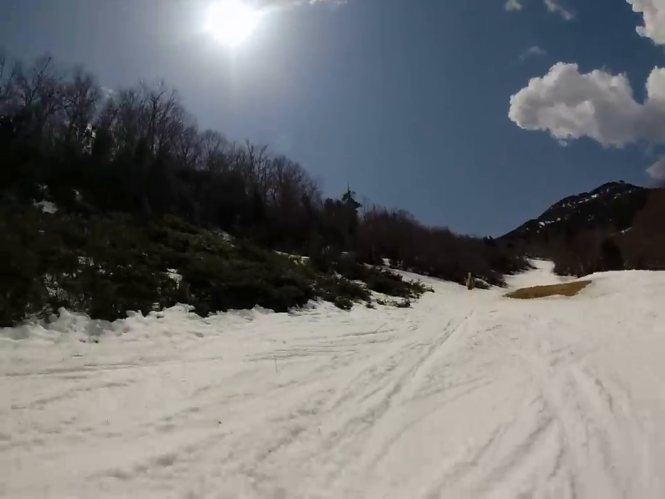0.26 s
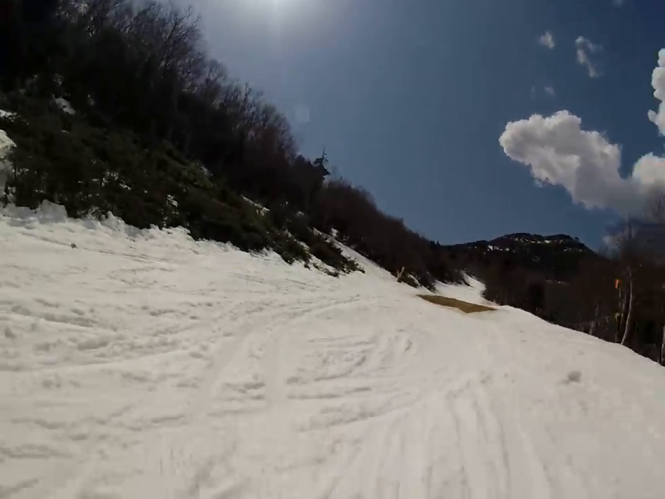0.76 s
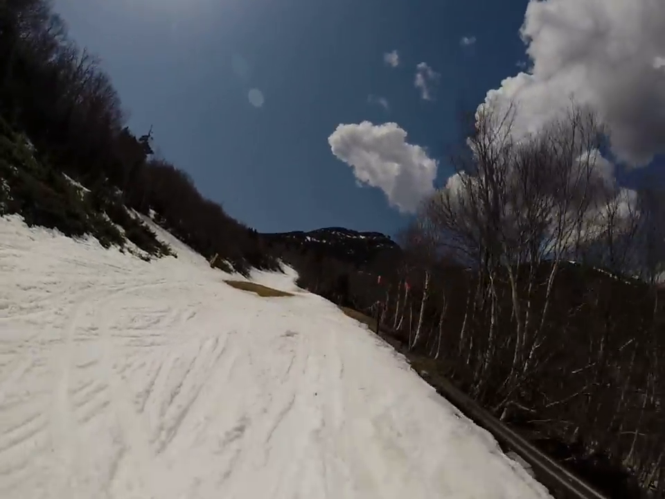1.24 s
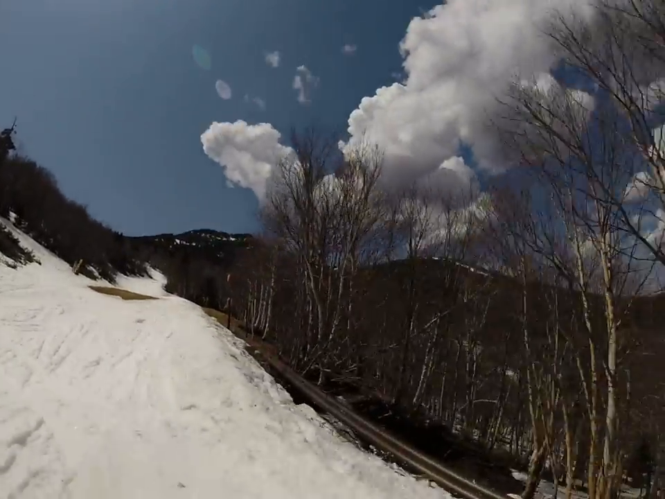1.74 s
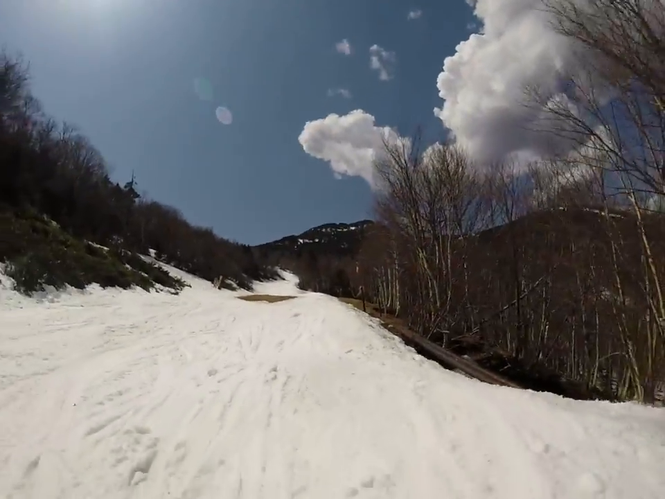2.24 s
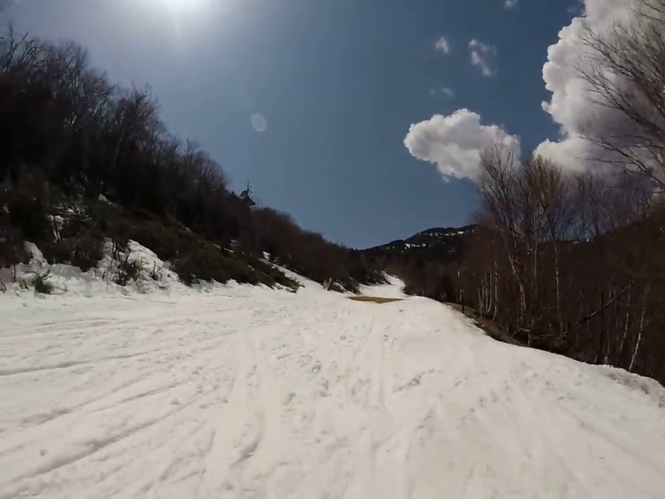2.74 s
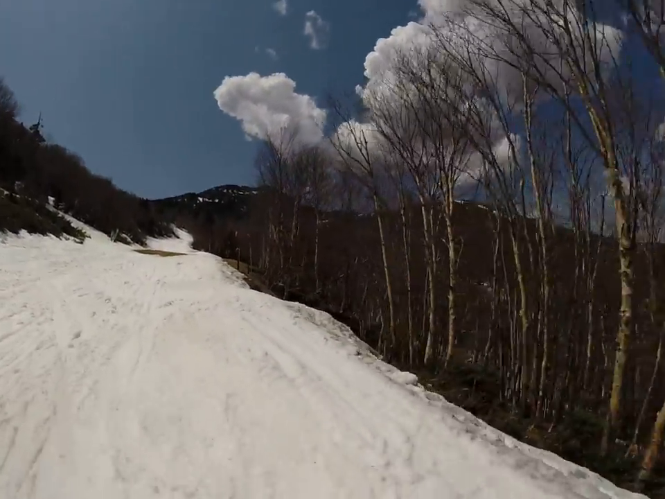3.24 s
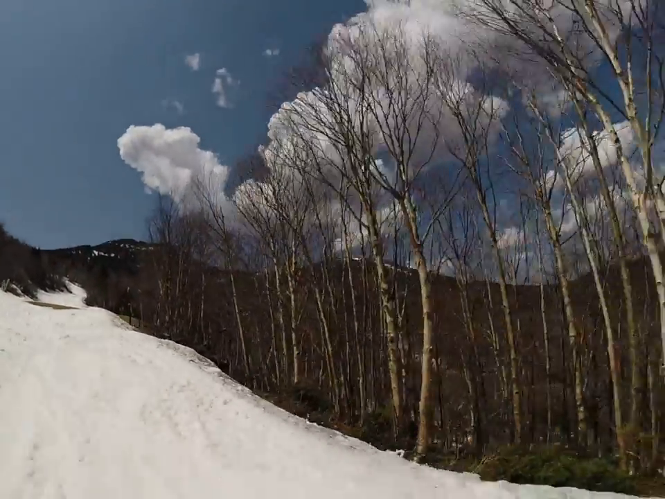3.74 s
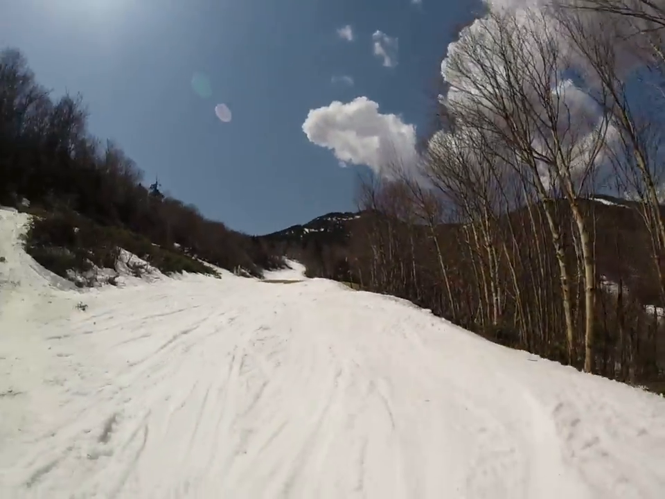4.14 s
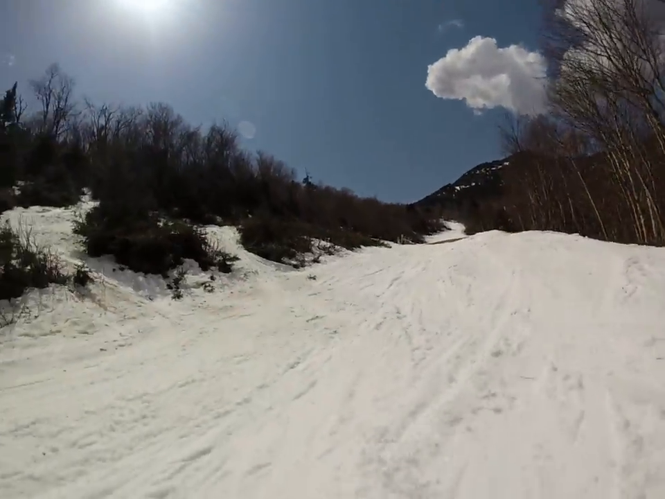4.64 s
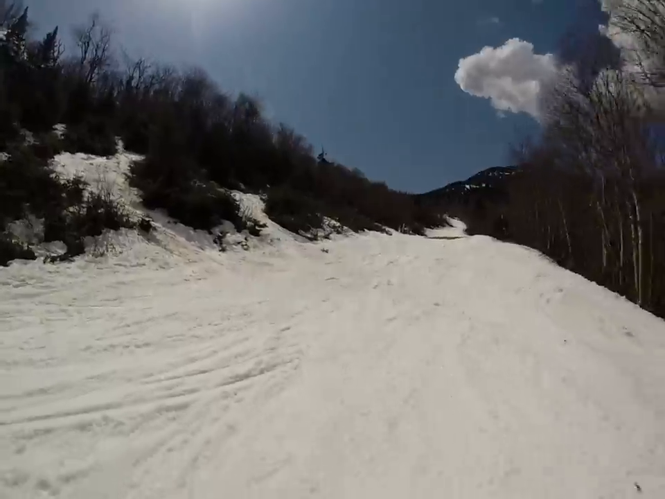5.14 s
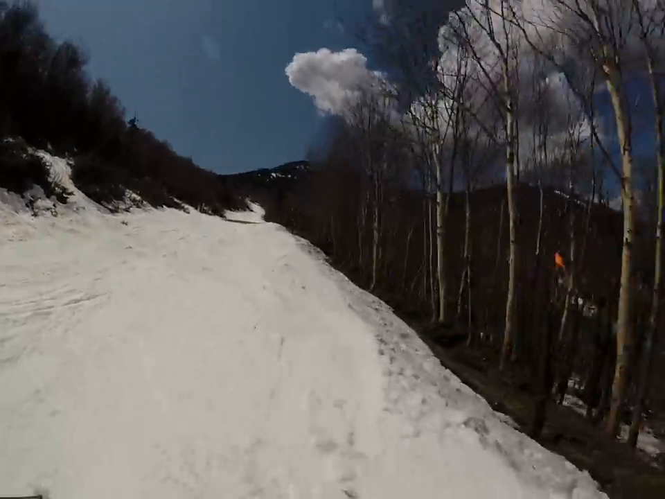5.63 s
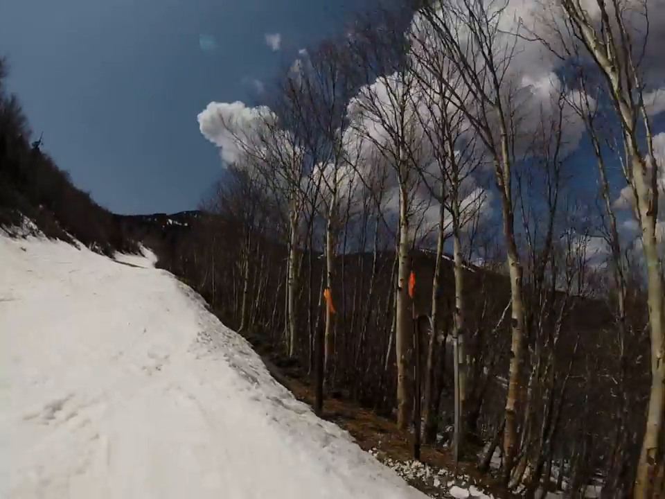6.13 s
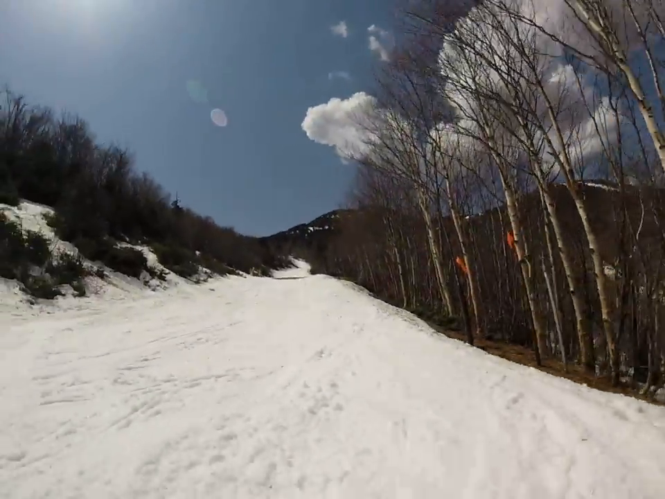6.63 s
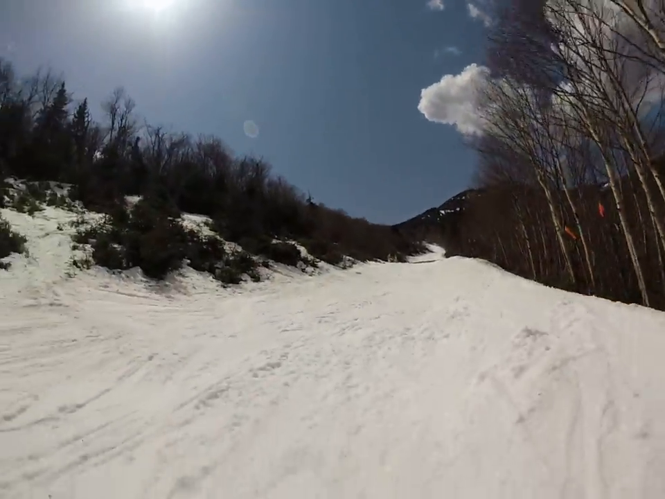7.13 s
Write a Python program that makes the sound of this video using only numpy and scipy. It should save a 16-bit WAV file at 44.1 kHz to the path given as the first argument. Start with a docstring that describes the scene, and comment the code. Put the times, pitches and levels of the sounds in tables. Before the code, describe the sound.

A plastic knock opens the sound, followed by a sharp clack at about 0.4 seconds. Skis hiss over wet, grainy snow throughout, heard close from a cased camera on the skier, with gusts of wind rumbling underneath. The edges scrape at the start, then throw a spray of slush from about 1.5 to 2 seconds, with a dull bump and a gust. Lighter turns follow near 2.5 and 3.5 seconds. Around 3.4 seconds the case clacks and knocks on its mount in a quick cluster. A stronger scrape runs from 4.6 to 5.1 seconds, ending with a sharp tick of ice. Another turn scrapes and sprays near 6 seconds, with a gust and small ticks, and one more near 6.9. A sharp clack comes at 7.2 seconds. All along, bumps thud softly and rough patches make the skis shudder and the case buzz.

```python
"""A plastic knock, then the hiss of skis on slushy spring snow, heard from a cased camera on the skier.
The bases glide on wet grains all the way; in each turn the edges scrape and throw a spray of slush.
Bumps thud up through the body, rough snow shakes the skis, and the case buzzes and clacks on its mount.
A few ice crumbs tick against it, and gusts of wind rumble underneath."""
import sys
import numpy as np
from scipy import signal
from scipy.fft import rfft, irfft, next_fast_len
from scipy.io import wavfile
from scipy.ndimage import uniform_filter1d, map_coordinates

SR = 44100
rng = np.random.default_rng(int(sys.argv[2]) if len(sys.argv) > 2 else 0)


def unload_wav(signal):
    """Save mono or channel-first audio to the path in sys.argv[1] as 16-bit WAV at rate SR, clipped to [-1, 1]."""
    wavfile.write(
        sys.argv[1],
        SR,
        np.round(np.clip(np.atleast_2d(signal).T, -1, 1) * 32767).astype(np.int16),
    )


N = 325458

# Tone of the wind on the case: f/Hz, level/dB
WIND_EQ = [(10, -9), (24, 5), (42, 0), (62, -11), (110, -20), (220, -42), (800, -81)]
# Gust strength, used relative to its mean: t/s, level/dB
GUSTS = [(0.0, -49), (0.33, -47.5), (0.68, -39), (1.52, -39.5), (1.58, -27.5), (1.72, -39.5), (1.77, -26),
         (1.89, -38), (2.32, -41), (2.49, -34.5), (2.84, -42.5), (3.1, -33.5), (3.19, -41), (3.33, -35),
         (3.41, -40), (3.53, -31), (3.74, -44), (4.01, -37), (4.62, -40.5), (4.73, -31), (4.83, -37),
         (5.65, -44), (6.17, -23), (6.23, -36), (6.68, -41), (7.38, -39)]
# Tone of the skis shaking over ruts: f/Hz, level/dB
JUDDER_EQ = [(30, -31), (75, 1), (140, -2), (220, -8.5), (350, -11), (550, -15), (1200, -26), (4000, -66)]
# Rough patches that rattle case and skis: middle t/s, length/s, buzz level/dB, judder level/dB
ROUGH_PATCHES = [(0.277, 0.16, -38, -50), (0.877, 0.16, -54, -52), (1.055, 0.062, -41, -49),
                 (1.225, 0.17, -41.5, -51.5), (1.55, 0.051, -41.5, -40), (1.812, 0.45, -45, -63),
                 (2.258, .04, -50, -57), (3.07, 0.096, -47.5, -49.5), (3.31, 0.038, -40, -51),
                 (3.553, 0.053, -35.5, -40), (3.972, 0.038, -47.5, -60), (4.188, 0.12, -46, -52),
                 (4.47, 0.081, -44, -49), (4.688, 0.05, -35.5, -69), (5.435, 0.11, -47.5, -53),
                 (5.723, 0.13, -49, -46), (6.08, 0.11, -39.5, -51), (6.398, .13, -41.5, -51.5)]
# The skis hit bumps: t/s, level/dB
BUMPS = [(0.121, -29.5), (0.891, -36), (0.918, -33.5), (1, -35), (1.762, -23), (1.997, -32), (2.13, -33),
         (2.463, -28.5), (2.701, -36.5), (3.023, -37), (3.462, -29.5), (3.564, -28.5), (4.099, -33),
         (4.753, -27), (5.714, -31.5), (6.108, -28), (6.439, -29.5), (6.96, -31.5), (7.11, -26.5)]
# Tone of a bump felt through the body: f/Hz, level/dB
THUD_EQ = [(30, -10.5), (110, 9), (200, -6), (380, -10.5), (520, -22.5), (900, -19), (2000, -56),
           (6000, -78)]
# Ice crumbs hit the case: t/s, level/dB
CRUMBS = [(0.1192, -24), (3.6331, -46), (5.0119, -12), (6.1395, -17), (6.552, -25.5), (7.2913, -28)]
# Tone of a crumb's tick: f/Hz, level/dB
TICK_EQ = [(200, -56), (900, 10), (1550, 8.5), (1900, 7), (3000, 4), (3800, 3), (4700, 8), (6200, -7),
           (8500, -41), (15000, -47)]
# The case hits its mount: t/s, clack level/dB, knock level/dB, thump level/dB
CLACKS = [(0.0004, -23.5, -19, -10), (0.3647, -2, -18.5, -20.5), (0.9206, -28.5, -38, -39),
          (1.1726, -30, -41, -28), (1.2146, -42, -49, -40), (1.5078, -26.5, -50, -28),
          (2.3181, -36, -46, -50), (3.3202, -44, -28, -15.5), (3.3859, -9, -14, -11.5),
          (3.4179, -30, -22.5, -19.5), (3.4625, -22, -37.5, -17), (3.5163, -28, -19.5, -14.5),
          (3.5367, -31, -21, -13), (5.014, -19, -25.5, -22), (5.6146, -29, -56, -38),
          (6.5817, -31, -24.5, -43), (7.1781, -2, -14, -10.5)]
# Ring of the case after a clack: f/Hz, level/dB, t60/s
SHELL_MODES = [(1614, -32, 0.031), (1830, -22.5, 0.053), (2810, -26, 0.046), (3460, -45, 0.027),
               (4500, -21.5, 0.005)]
# Ring of the mount: f/Hz, level/dB, t60/s
MOUNT_MODES = [(572.5, -17, 0.091), (702, -16.5, 0.03), (940, -34, .018)]
# Tone of the knock in the mount: f/Hz, level/dB
KNOCK_EQ = [(20, -22), (70, -8), (150, 7), (330, 5), (470, -14), (590, 4), (900, -1.5), (1120, -10),
            (1550, 4), (1900, -21.5), (3000, -33), (4000, -16), (12000, -29)]
# Peaks and dips of the shaken case: f/Hz, width/Hz, level/dB
CASE_COLOUR = [(340, 270, 5.5), (1537, 170, 5), (1805, 134, -12), (2160, 250, 10), (3290, 360, 3),
               (4840, 160, 6), (5340, 260, 1), (5600, 290, 0.5), (7220, 500, 4), (8600, 1400, -4.5),
               (9020, 490, 3.5)]
# Peaks and dips of its front wall for airborne sound: f/Hz, width/Hz, level/dB
WALL_COLOUR = [(2380, 500, 7.5), (2960, 240, 6.5), (3570, 130, -14), (4470, 200, 5), (5140, 140, -16),
               (5470, 440, 6.5), (6400, 310, 2.5)]
# Base fader for the hiss, scrape and spray of skis running flat: t/s, level/dB
SLIDE_FADER = [(0.04, -62.5), (0.1, -62), (0.32, -65), (0.86, -64.5), (0.88, -61), (1.08, -70),
               (1.26, -63.5), (1.33, -67.5), (1.84, -62), (2.06, -72), (2.33, -69.5), (2.45, -66),
               (2.68, -65.5), (2.9, -69.5), (3.41, -61.5), (4.07, -67.5), (4.15, -68), (4.44, -61),
               (4.82, -60), (5.09, -63), (5.17, -67.5), (6.03, -61), (6.17, -72), (6.21, -58),
               (6.25, -65.5), (6.52, -64), (6.77, -65.5), (6.81, -63), (6.97, -63.5), (6.99, -57),
               (7.17, -66.5), (7.38, -60)]
# Tone of the bases on wet snow: f/Hz, level/dB
GLIDE_EQ = [(300, -2), (1000, -27), (3000, 5), (7300, 4.5), (8500, 2.5), (11000, -4), (15000, -11)]
# Tone of the thrown slush: f/Hz, level/dB
SPRAY_EQ = [(250, -6.5), (600, -1), (1300, -1.5), (2000, 5.5), (2900, -0.5), (3800, -2), (6300, -4.5),
            (7500, -21.5), (10000, -39), (15000, -36)]
# Tone of the scraping edges: f/Hz, level/dB
SCRAPE_EQ = [(150, -26), (400, -12), (750, -5), (1250, 0.5), (1700, 3), (2600, -11), (3500, -8.5),
             (6000, -27), (12000, -49)]
# Turns and brief checks: full bite t/s, hold/s, rise/s, release/s, scrape level/dB, spray level/dB
TURNS = [(0.003, 0.29, .2, 0.43, -47.5, -62), (1.53, 0.052, 0.065, 0.17, -47, -51),
         (1.718, 0.15, 0.45, 0.24, -48, -39.5), (2.111, 0.02, 0.032, 0.034, -50, -46.5),
         (2.45, 0.15, 0.27, 0.52, -48.5, -59), (3.52, .3, 0.25, 0.35, -68.5, -44.5),
         (4.621, .44, 0.099, 0.22, -39, -54.5), (6.05, 0.14, 0.31, 0.44, -42, -37.5),
         (6.852, 0.1, 0.18, 0.58, -39.5, -48)]


def amp(db):
    """Decibels to gain."""
    return 10 ** (np.asarray(db) / 20)


def unit(x):
    """Scale to rms 1."""
    return x / np.sqrt(np.mean(x ** 2) + 1e-20)


def eq_gain(eq, hz):
    """Gain of an EQ curve, read on a log frequency axis."""
    f, db = np.transpose(eq)
    return amp(np.interp(np.log(hz + 1), np.log(f), db))


def fader(points):
    """Join timed levels with straight ramps, one value a sample."""
    return np.interp(np.arange(N) / SR, *np.transpose(points))


def wobble(rate):
    """A smooth random curve, rate knots a second."""
    knots = rng.standard_normal(4096)
    coarse = np.arange(0, N, 32)
    return np.interp(np.arange(N), coarse, map_coordinates(knots, [coarse * rate / SR], mode="wrap"))


def swells(rows):
    """Joint gain of bell-shaped swells: middle t/s, length/s, level/dB."""
    coarse = np.arange(0, N, 32)
    power = sum(amp(db) ** 2 * np.exp(-(2 * (coarse / SR - s) / length) ** 2) for s, length, db in rows)
    return np.interp(np.arange(N), coarse, np.sqrt(power))


def filtered(x, response):
    """Shape x with a frequency response."""
    size = next_fast_len(len(x) + SR // 4)
    return irfft(rfft(x, size) * response(np.fft.rfftfreq(size, 1 / SR)), size)[:len(x)]


def through_case(x, eq, colour):
    """Give x its tone and the peaks and dips of the plastic, at rms 1."""
    def colour_db(hz):
        return sum(db / (1 + (2 * (hz - centre) / width) ** 2) for centre, width, db in colour)
    return unit(filtered(x, lambda hz: eq_gain(eq, hz) * amp(colour_db(hz))))


def pulse(eq, size=4096):
    """A minimum-phase hit with this tone, at peak 1."""
    cepstrum = irfft(np.log(eq_gain(eq, np.fft.rfftfreq(size, 1 / SR))))
    cepstrum[1:size // 2] *= 2
    cepstrum[size // 2 + 1:] = 0
    hit = irfft(np.exp(rfft(cepstrum)))
    return hit / np.abs(hit).max()


def ring(modes, t, scatter_db=1.5):
    """Damped modes, struck at new strengths each time."""
    return sum(amp(db + scatter_db * rng.standard_normal() - 60 * t / t60) * np.sin(2 * np.pi * hz * t)
               for hz, db, t60 in modes)


def bloom(t, hz, peak_s):
    """A tone that swells until peak_s, then dies away."""
    return t / peak_s * np.exp(1 - t / peak_s) * np.sin(2 * np.pi * hz * t)


def add(track, s, sound):
    """Mix a sound into the track at time s."""
    start = round(s * SR)
    track[start:start + len(sound)] += sound[:N - start]


def grains(rate, share):
    """Random tiny impacts, rate a second, carrying a share of the power over a smooth rush."""
    impacts = (rng.random(N) < rate / SR) * rng.standard_normal(N)
    return np.sqrt(share) * unit(impacts) + np.sqrt(1 - share) * rng.standard_normal(N)


def strikes(hits, eq, crunch_db, crunch_t60):
    """Each blow is one push and a short crunch of crushed snow."""
    track, t = np.zeros(N), np.arange(SR // 16) / SR
    push = pulse(eq)
    for s, db in hits:
        crunch = rng.standard_normal(len(t)) * amp(-60 * t / crunch_t60)
        force = (t == 0) + amp(crunch_db) * crunch / np.linalg.norm(crunch)
        blow = signal.fftconvolve(force, push)
        add(track, s, amp(db) * blow * np.linalg.norm(push) / np.linalg.norm(blow))
    return track


def wind(mean_db=-42, gust_depth=1.15):
    """Eddies buffet the case: an even low bed that swells with each gust."""
    eddies = filtered(rng.standard_normal(N), lambda hz: eq_gain(WIND_EQ, hz))
    bed = eddies / np.sqrt(np.abs(uniform_filter1d(eddies ** 2, size=SR // 8)) + 1e-12)
    gust_db = fader(GUSTS)
    return bed * amp(mean_db + gust_depth * (gust_db - gust_db.mean()) + 2.0 * wobble(9.8))


def ski_judder(edge_spray, flat_db=-53.5, plough_knee_db=-52):
    """The skis shudder over small ruts, harder on rough patches and where they plough."""
    plough = np.hypot(1, edge_spray / amp(plough_knee_db)) ** 0.11
    rough = swells([(s, length, db) for s, length, _, db in ROUGH_PATCHES])
    ruts = grains(rate=260, share=0.41) * amp(3.2 * wobble(18))
    judder = unit(filtered(ruts, lambda hz: eq_gain(JUDDER_EQ, hz)))
    return np.hypot(amp(flat_db) * plough, rough) * judder


def bump_thuds(sway_db=-14.5):
    """Each bump thuds up through the body and rocks the camera for a few slow cycles."""
    track = strikes(BUMPS, THUD_EQ, crunch_db=2.5, crunch_t60=0.071)
    sway = bloom(np.arange(SR // 4) / SR, hz=36.8, peak_s=0.031)
    for s, db in BUMPS:
        add(track, s, amp(db + sway_db) * sway)
    return track


def ice_ticks():
    """Crumbs of ice strike the case with a tiny crunch."""
    return strikes(CRUMBS, TICK_EQ, crunch_db=6, crunch_t60=0.0071)


def case_buzz(edge_scrape, idle_db=-56, edge_send_db=-8.5, centre_hz=2270, width_hz=450):
    """Vibration keeps the case chattering in flurries of tiny taps on its main resonance."""
    def resonance(hz):
        return 1j * hz * width_hz / (centre_hz ** 2 - hz ** 2 + 1j * hz * width_hz)
    running = np.hypot(amp(idle_db + 2.1 * wobble(16)), amp(edge_send_db) * edge_scrape)
    rough = swells([(s, length, db) for s, length, db, _ in ROUGH_PATCHES])
    flurries = grains(rate=990, share=0.37) * amp(2.1 * wobble(80))
    hard_taps = amp(-9.5) * grains(rate=28, share=1)
    chatter = unit(filtered(flurries + hard_taps, lambda hz: resonance(hz) ** 2))
    return np.hypot(running, rough) * chatter


def case_clacks(thump_hz=128, thump_t60=0.016):
    """The case snaps against its mount: a short clack, a knock in the mount and a low thump."""
    track, t = np.zeros(N), np.arange(4096) / SR
    clack = bloom(t, hz=2310, peak_s=0.00079)  # coupled walls hand the blow over in a few cycles
    knock = pulse(KNOCK_EQ, size=len(t))
    thump = amp(-60 * t / thump_t60) * np.sin(2 * np.pi * thump_hz * t)
    for s, clack_db, knock_db, thump_db in CLACKS:
        add(track, s, amp(clack_db) * (clack + ring(SHELL_MODES, t)))
        add(track, s, -amp(knock_db) * (knock + ring(MOUNT_MODES, t)))
        add(track, s + 0.00286, amp(thump_db) * thump)  # the mount gives way just after the blow
    return track


def soften(x, corner_hz):
    """Plastic and wet snow give a little on contact, which takes off the top."""
    return signal.sosfilt(signal.butter(3, corner_hz, fs=SR, output="sos"), x)


def edge_bite(ramp_db=19):
    """Scrape and spray envelopes: the edges bite, hold and let go, by ramp_db per rise or release."""
    t, scrape_power, spray_power = np.arange(N) / SR, 0, 0
    for s, hold, rise, release, scrape_db, spray_db in TURNS:
        before, after = np.maximum(s - t, 0), np.maximum(t - s - hold, 0)
        bite = amp(-ramp_db * (before / rise + after / release))
        scrape_power += (amp(scrape_db) * bite) ** 2
        spray_power += (amp(spray_db) * bite) ** 2
    return np.sqrt(scrape_power), np.sqrt(spray_power)


def skis_on_slush(edge_scrape, edge_spray, splash_s=0.07, splash_send_db=-25.5):
    """Bases hiss on the wet surface, edges shear off clumps, and the thrown slush patters down."""
    heaps = amp(0.65 * wobble(22))  # heaps of slush swell all three layers
    clumps = wobble(45)  # uneven snow under the edge drives both scrape and spray
    shearing = grains(rate=3000, share=0.57) * amp(clumps + 1.9 * wobble(170))
    patter = grains(rate=5000, share=0.43) * amp(2.26 * clumps)
    wet_patches = amp(0.17 * wobble(22) + 1.05 * wobble(60))
    sliding = grains(rate=5500, share=0.22) * wet_patches
    slide_db = fader(SLIDE_FADER)  # keeps all three layers going between turns
    splash = swells([(s, splash_s, db + splash_send_db) for s, db in BUMPS])  # bumps throw up slush
    thrown = np.hypot(edge_spray, splash)
    glide = np.hypot(amp(slide_db + 8.5), amp(-2) * splash) * through_case(sliding, GLIDE_EQ, CASE_COLOUR)
    spray = np.hypot(amp(slide_db + 9.5), thrown) * through_case(patter, SPRAY_EQ, WALL_COLOUR)
    scrape = np.hypot(amp(slide_db + 11), edge_scrape) * through_case(shearing, SCRAPE_EQ, CASE_COLOUR)
    return heaps * (glide + spray + scrape)


def scene():
    """The mono mix at the camera: rumble below, hits and buzz within, the skis on top."""
    edge_scrape, edge_spray = edge_bite()
    thuds = bump_thuds()
    contacts = soften(ice_ticks() + case_clacks(), corner_hz=5600)
    skis = skis_on_slush(edge_scrape, edge_spray)
    buzz = case_buzz(edge_scrape)
    rumble = wind() + ski_judder(edge_spray)
    return (rumble + thuds + contacts + buzz + skis)[None]


def record(dry):
    """The camera sheds the deepest rumble and keeps nothing above its band limit."""
    low_cut_hz, top_hz = 13.8, 15250
    low_cut = signal.butter(2, low_cut_hz, "highpass", fs=SR, output="sos")
    return filtered(signal.sosfilt(low_cut, dry[0]), lambda hz: hz < top_hz)[None]


dry = scene()
out = record(dry)
unload_wav(out)
```